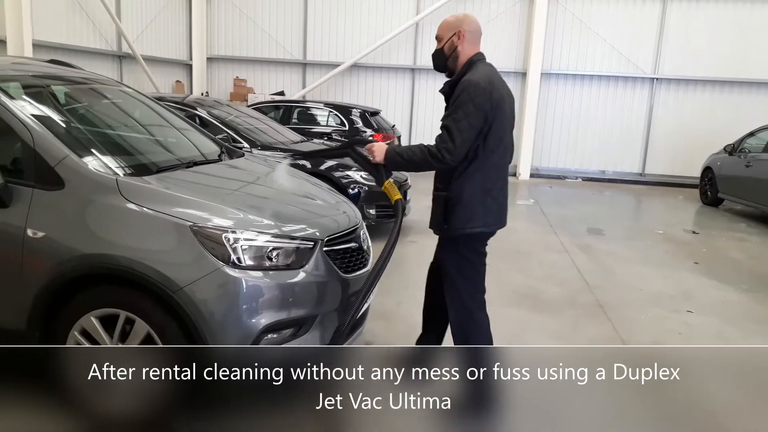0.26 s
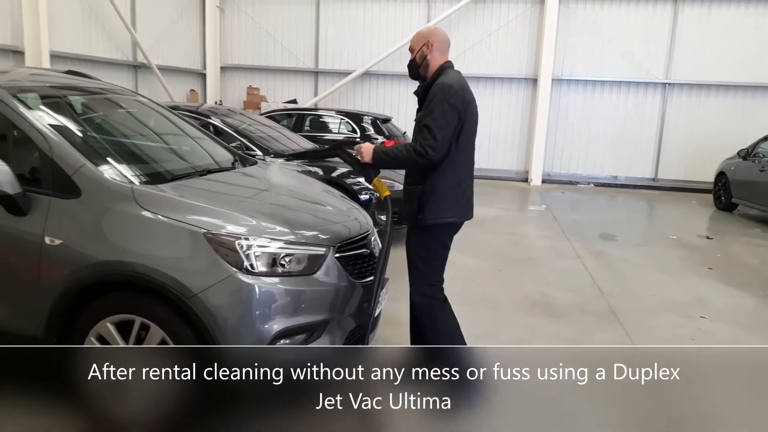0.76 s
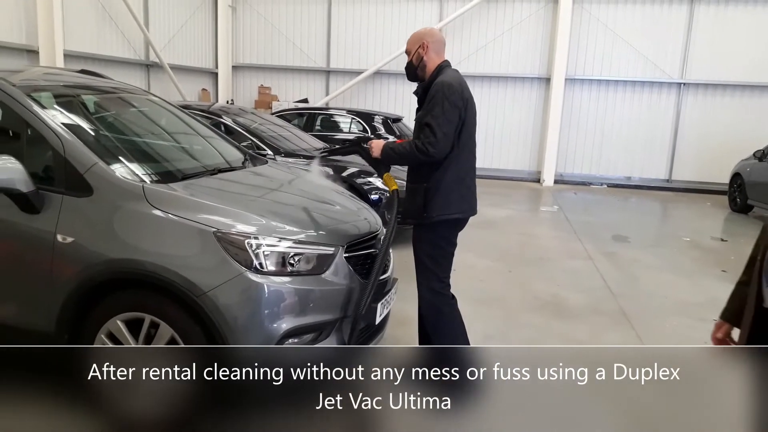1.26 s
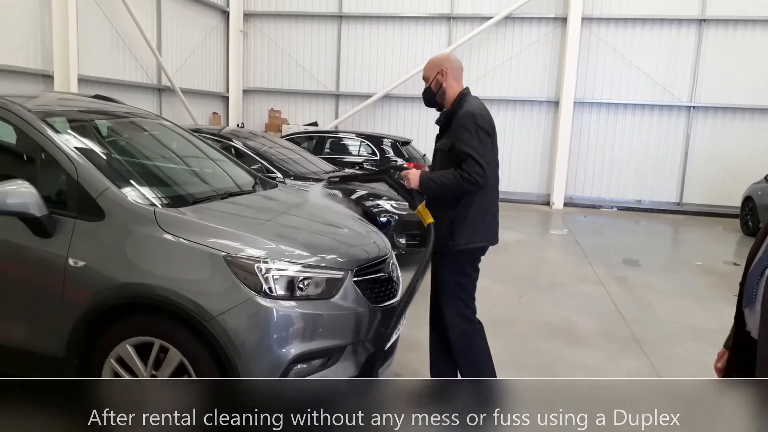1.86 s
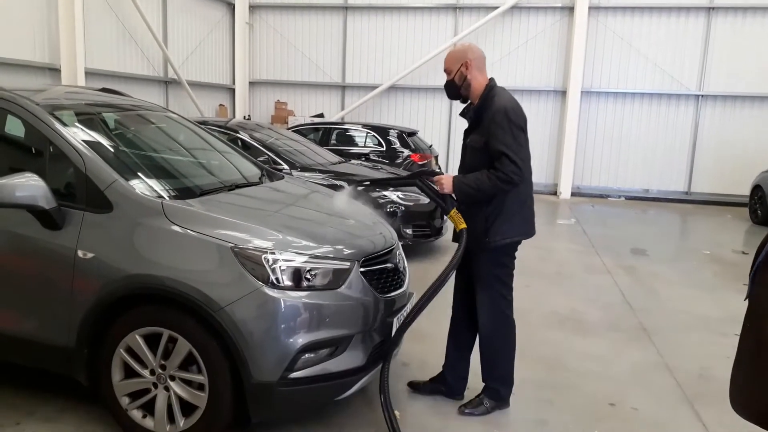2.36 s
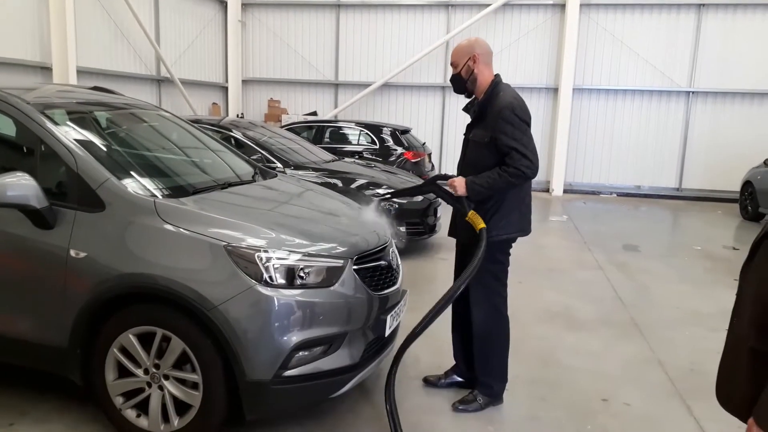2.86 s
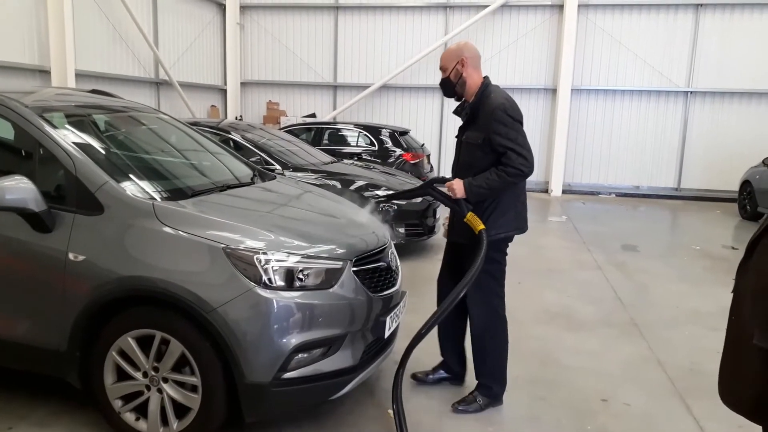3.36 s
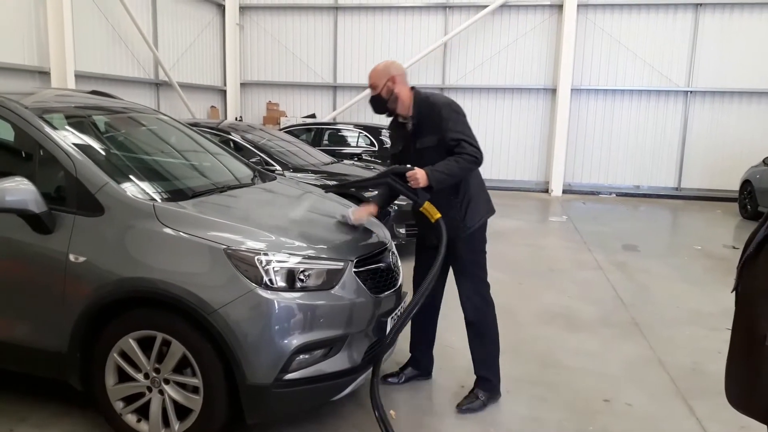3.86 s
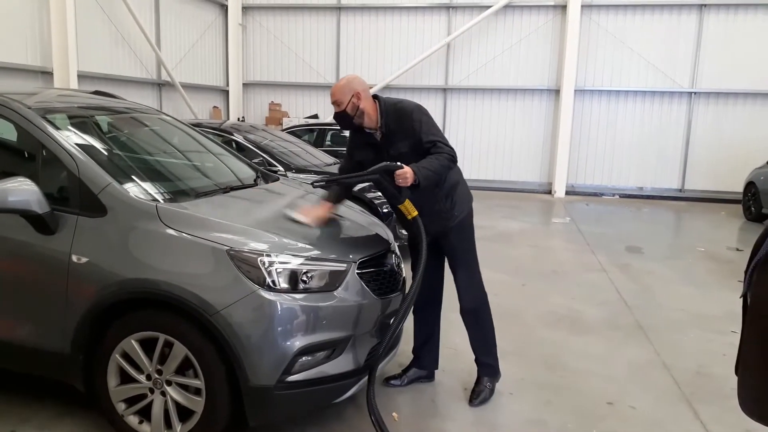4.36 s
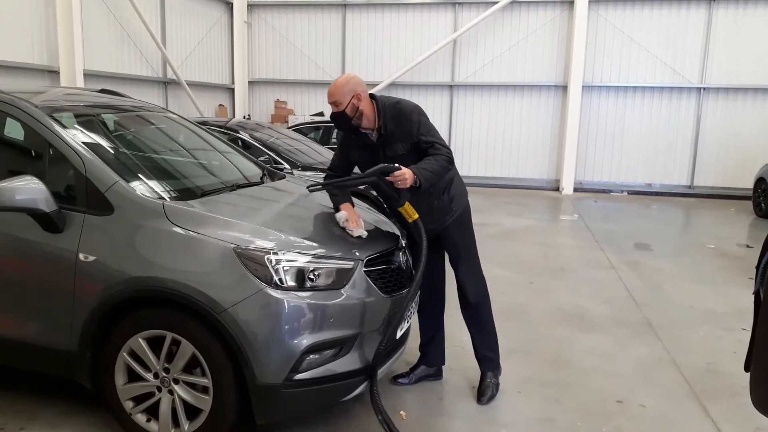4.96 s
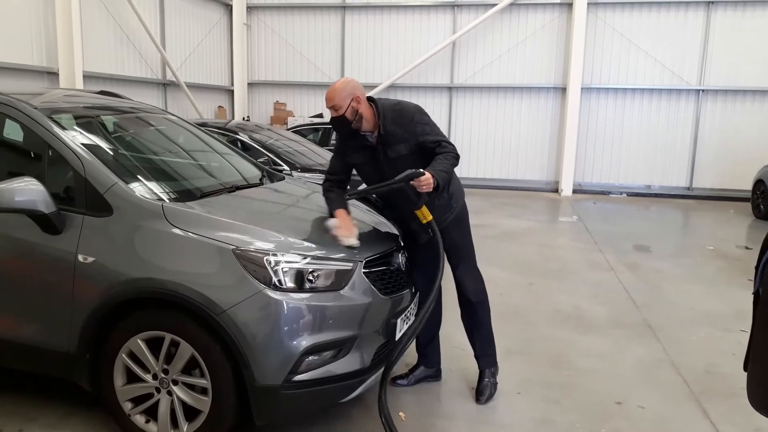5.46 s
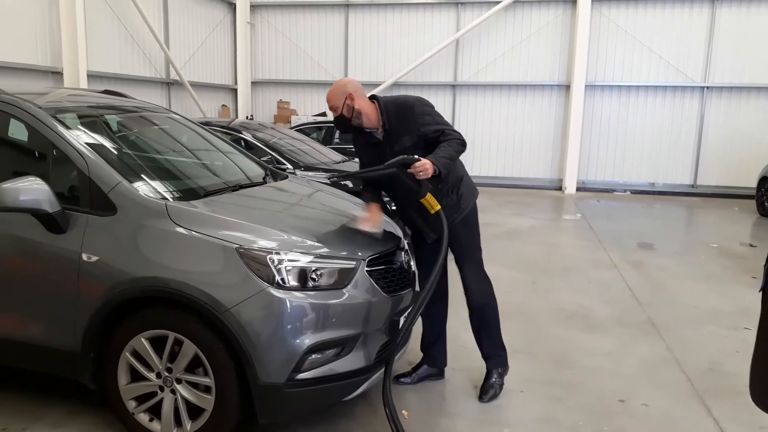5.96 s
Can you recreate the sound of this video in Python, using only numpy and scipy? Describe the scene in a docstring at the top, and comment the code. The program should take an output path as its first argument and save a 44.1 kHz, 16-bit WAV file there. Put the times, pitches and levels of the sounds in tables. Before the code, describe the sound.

A steam cleaner hisses close in front of the microphones in a large, bare hall. The hiss starts faintly, spits at about 0.3 seconds and turns louder and fuller at 0.8 seconds as the jet meets a car bonnet. It carries on with short surges, sizzling and roaring, with brief airy whistles between about 0.8 and 2 seconds and again from 3 to 5. The strongest surge and whistle come near 4.8 seconds. Just after 5 seconds the trigger is released and the hiss dies away in the hall.

Further off, a low motor drone climbs in pitch to about 1.2 seconds, sinks, swells again around 3 seconds and then weakens. Clusters of dull panel thuds boom through the building at the very start, around 1.2 seconds, near 3.9 and from 5 to 5.4. A low air-handling hum continues throughout.

```python
"""A large, bare hall, heard through a pair of microphones as a steam cleaner works over a car bonnet.
In front, the turbulent jet hisses, roars where it strikes the panel and whistles briefly on edges;
the trigger is let go and the hiss dies away in the hall. Further off, a motor drones low, its speed
rising and sinking, and dull blows on a panel boom through the building. Air handling hums behind it all."""
import sys
import numpy as np
from scipy import signal
from scipy.fft import rfft, irfft, next_fast_len
from scipy.io import wavfile

SR = 44100
rng = np.random.default_rng(int(sys.argv[2]) if len(sys.argv) > 2 else 0)


def bounce(signal):
    """Save signal as a 16-bit WAV file at the path given by the first command-line argument."""
    frames = np.transpose(np.atleast_2d(signal))
    limited = np.clip(frames, -1, 1)
    pcm = np.round(limited * 32767).astype(np.int16)
    wavfile.write(sys.argv[1], SR, pcm)


N = 273199
TIME = np.arange(N) / SR

# The jet in front of the microphones: its own hiss, its head-on roar and its grazing sizzle.
# Each row: frequency in Hz, relative spectral density in dB.
JET_SPECTRUM = [(900, -28), (2000, -9), (3200, -4), (4500, 1), (6000, -0.5), (7400, -0.5), (8700, 1.5),
                (9800, -5.5), (12000, -3), (16000, -12)]
ROAR_SPECTRUM = [(150, -10.5), (250, 1), (350, -3.5), (470, -9.5), (650, -6), (950, -7.5), (1300, -4),
                 (1600, -1), (2050, 0.5), (2500, -1), (3100, -0.5), (4200, -6), (7000, -21)]
SIZZLE_SPECTRUM = [(7000, -35), (9300, 2), (10200, -1.5), (11800, 3), (13500, 4), (16000, 4)]
# Steam flow while the trigger is held.
# Each row: time in seconds, level in dB, brightness in dB (plus is more sizzle, minus more roar).
STEAM_FLOW = [(0, -61, -1.8), (.14, -53.5, 1), (.27, -51, 1.7), (.33, -48, 3), (.73, -47.5, 2.2),
              (.82, -40, 0.61), (1.27, -41.5, -1.1), (1.55, -38, 0.61), (1.84, -39, -1.68),
              (2.25, -39, -0.0073), (3.05, -35.5, 1.44), (3.32, -38.5, 1.1), (3.75, -40, 1.03),
              (4.25, -35.5, 1.1), (5.0, -37, 1.76)]
# Surges as the valve spits or the nozzle sweeps close over the bonnet.
# Each row: start in seconds, length in seconds, level in dB, brightness in dB, edge rush in dB.
STEAM_SURGES = [(0.274, 0.027, -39, 6, -47), (0.743, 0.049, -45.5, 12.5, -68), (1.313, 0.3, -46, -8, -56),
                (1.86, 0.16, -39.5, 4, -46.5), (2.367, 0.18, -41.5, 5, -54), (2.662, 0.1, -38.5, 1, -44),
                (2.88, .17, -40, -.5, -42), (3.177, .06, -45, 5, -47), (3.383, 0.11, -38, 2, -40.5),
                (3.479, 0.12, -38.5, 4, -48), (3.794, 0.12, -45, 7, -69), (3.904, 0.17, -46, -7, -54),
                (4.21, 0.087, -40.5, 10, -42), (4.463, 0.052, -50, 20, -56), (4.73, .09, -37.5, -0.5, -45),
                (4.808, 0.099, -33.5, 3, -38.5), (5.58, 0.079, -50.5, 0.5, -59)]
ROAR_DB, SIZZLE_DB = -3, -2.2   # relative to the jet, at brightness 0
ON_PANEL_S, FREE_JET_DB = 0.834, -3   # until the jet meets the panel it roars and sizzles less
SHUT_S, DIE_DB_PER_S = 5.06, 21.5   # the trigger is let go and the hiss dies away in the hall
DIRECT_DB, CLOSE_S = 3.5, 0.11   # jet and sizzle first lose their direct sound as the valve closes
SURGE_ATTACK_S, SURGE_RELEASE_S = 0.035, 0.039
SURGE_ECHO_DB, WHISTLE_ECHO_DB, ECHO_S = -4, -5, 0.18   # surges and whistles linger in the hall

def steam(flutter_db, own_flutter_db):
    """Turbulent jet, roar, sizzle and edge rush flutter together; the first three also on their own."""
    flow_db, flow_bright_db = in_time(STEAM_FLOW)
    shut_for = np.maximum(TIME - SHUT_S, 0)
    direct_db = DIRECT_DB * (np.exp(-shut_for / CLOSE_S) - 1)
    flow_gains = jet_shares(flow_db - DIE_DB_PER_S * shut_for, flow_bright_db)
    power = (flow_gains * from_db(np.outer([1, 0, 1], direct_db))) ** 2   # rows: jet, roar, sizzle
    rush_power = 0
    for start, length, db, bright_db, rush_db in STEAM_SURGES:
        swell = surge(start, length) ** 2
        power = power + jet_shares(db, bright_db)[:, None] ** 2 * swell
        rush_power = rush_power + from_db(rush_db) ** 2 * swell
    free_db = FREE_JET_DB * np.clip((ON_PANEL_S - TIME) / SURGE_ATTACK_S, 0, 1)
    gains = np.sqrt(power) * from_db(np.outer([0, 1, 1], free_db))
    out = np.sqrt(rush_power) * ringing_noise((2, N), hz=3200, width_hz=1400)   # rush over an edge
    for gain, spectrum in zip(gains, (JET_SPECTRUM, ROAR_SPECTRUM, SIZZLE_SPECTRUM)):
        own_db = own_flutter_db * np.array([drift(14), drift(14)])
        out = out + gain * from_db(own_db) * diffuse_noise(spectrum)
    return out * from_db(flutter_db * drift(19))


def jet_shares(db, bright_db):
    """Gains of jet, roar and sizzle: a grazing jet trades roar for sizzle."""
    return from_db([db, db + ROAR_DB - bright_db, db + SIZZLE_DB + bright_db])


def surge(start, length):
    """Envelope of one surge: attack, hold and quick release, then its echo in the hall."""
    attack = np.clip((TIME - start) / SURGE_ATTACK_S, 0, 1)
    over_for = np.maximum(TIME - start - length, 0)
    release = np.exp(-over_for / SURGE_RELEASE_S)
    echo = from_db(SURGE_ECHO_DB) * np.exp(-over_for / ECHO_S)
    return attack * np.maximum(release, echo)


# The jet singing in gaps of the bonnet, in front of the microphones.
# Each row: start in seconds, length in seconds, pitch in Hz, level in dB.
GAP_WHISTLES = [(.28, .074, 7240, -58), (.285, .08, 3200, -53), (.756, .2, 8160, -44),
                (0.8, 0.27, 1540, -48), (1.35, .22, 2120, -49.5), (1.61, 0.24, 1870, -46.5),
                (3.2, 0.073, 10060, -41), (3.915, 0.24, 1910, -51), (4.372, 0.068, 12100, -39),
                (4.834, 0.12, 2124, -35)]

def whistles(q):
    """Turbulence rings in a gap as the jet crosses it: a quick swell, a slower fade and an echo."""
    out = np.zeros((2, N))
    for start, length, hz, db in GAP_WHISTLES:
        since = np.maximum(TIME - start, 0)
        age = since / (length / 4)   # 1 at the peak
        swell = age * np.exp(1 - age)
        echo = from_db(WHISTLE_ECHO_DB) * np.minimum(age, 1) * np.exp(-since / ECHO_S)
        out += from_db(db) * np.maximum(swell, echo) * ringing_noise((2, N), hz, hz / q)
    return out


def bonnet_echo(hiss, delay_s, sway, echo_db):
    """The bonnet mirrors the hiss; the nozzle moves, so a faint ripple slides through the treble."""
    delays = delay_s * np.exp(sway * np.array([drift(0.658), drift(0.68)]))
    mirrored = np.array([np.interp(TIME - delay, TIME, side) for delay, side in zip(delays, hiss)])
    return hiss + from_db(echo_db) * mirrored


# Dull blows further off in the building.
# Each row: start in seconds, relative level in dB, pitch in Hz around which the panel is excited.
BLOWS = [(.102, -25.5, 140), (.139, -32.5, 125), (.18, -30, 190), (.225, -33.5, 257), (.355, -37.5, 316),
         (1.121, -36.5, 470), (1.152, -32, 556), (1.16, -28.5, 237), (1.192, -38, 199), (3.091, -39.5, 266),
         (3.916, -35, 320), (3.942, -33.5, 258), (4.262, -59, 252.3), (5, -32.5, 217), (5.083, -35, 130),
         (5.119, -38, 150), (5.181, -39, 276), (5.236, -44, 280), (5.322, -31, 100.5), (5.346, -34, 151)]
# Modes of the booming panel. Each row: frequency in Hz, relative level in dB, ring time in seconds.
PANEL_MODES = [(110.6, -2.5, 0.14), (137, -2, 0.065), (162.8, -3, 0.064), (201.5, -4.5, 0.052),
               (245.4, -1.5, 0.082), (275.6, -2.5, 0.12), (321.3, -4, 0.13), (518, -6, .04),
               (622, -8, 0.047), (694.7, -5.5, 0.057)]

def thuds(contact_s, spread_octaves, rattle_db, dull_hz):
    """Each soft blow rings the panel's modes near its pitch, with a little rattle around each."""
    out, t = np.zeros(N + SR), TIME[:SR // 2]
    for start, db, centre_hz in BLOWS:
        at = round(start * SR)
        for hz, mode_db, t60 in PANEL_MODES:
            reach = np.exp(-.5 * (np.log2(hz / centre_hz) / spread_octaves) ** 2)
            swell = (1 - np.exp(-t / contact_s)) ** 2 * from_db(-60 * t / t60)
            ring = np.sin(2 * np.pi * hz * t) + from_db(rattle_db) * ringing_noise(len(t), hz, hz / 2)
            out[at:at + len(t)] += from_db(db + mode_db) * reach * swell / swell.max() * ring
    return signal.sosfilt(signal.butter(2, dull_hz, fs=SR, output="sos"), out[:N])


# The motor, further off than the jet. Each row: time in seconds, firing rate in Hz, level in dB.
MOTOR_RUN = [(0, 47.6, -64), (.25, 51.7, -46.5), (.73, 60.5, -47), (.81, 64, -38.5), (1.2, 74.9, -33),
             (1.42, 73.2, -37), (1.6, 66.2, -35), (1.78, 55.2, -50.5), (2.18, 43.6, -55), (2.33, 44, -43.5),
             (2.8, 47.74, -38), (3.12, 50.1, -34), (3.3, 51.8, -46), (3.95, 50.7, -42), (4.3, 49.7, -59),
             (4.75, 45.96, -47), (4.98, 46.27, -66), (6.19, 46, -53)]
# Standing waves of the hall, as they reach the microphones.
# Each row: frequency in Hz, width in Hz, peak in dB relative to the motor's first order.
HALL_WAVES = [(85.96, 4.9, 5), (99.8, 3.2, -9), (109.8, 1.6, 7)]

def motor(rough_db, second_order_db):
    """The motor's two lowest orders, unsteady; the second swells as it glides through a standing wave."""
    hz, db = in_time(MOTOR_RUN)
    phase = 2 * np.pi * np.cumsum(hz) / SR
    second_gain = from_db(second_order_db)
    for wave_hz, width_hz, peak_db in HALL_WAVES:
        second_gain = second_gain + from_db(peak_db) * np.exp(-2 * ((2 * hz - wave_hz) / width_hz) ** 2)
    first = from_db(rough_db * drift(12)) * np.sin(phase)
    second = second_gain * from_db(rough_db * drift(10)) * np.sin(2 * phase)
    return from_db(db) * (first + second)


# The bare hall's decay. Each row: frequency in Hz, reverberation time in seconds.
HALL_DECAY = [(80, 1.64), (300, 1.3), (1000, 4.4), (4000, 5.2)]

def hall_reverb(x, build_s):
    """The hall answers with a diffuse tail that builds up and dies away, octave by octave."""
    noise = diffuse_noise([(20, 0), (20000, 0)])[:, :2 * SR]
    t, tail = TIME[:2 * SR], 0
    for hz in 80 * 2 ** np.arange(6):
        band = signal.butter(2, [hz / np.sqrt(2), hz * np.sqrt(2)], "band", fs=SR, output="sos")
        tail = tail + signal.sosfilt(band, noise) * from_db(-60 * t / at_hz(HALL_DECAY, hz))
    tail = tail * (1 - np.exp(-t / build_s))
    tail = tail / np.sqrt(np.sum(tail ** 2) / 2)   # unit energy per side
    return signal.fftconvolve(x[None], tail, axes=1)[:, :N]


# The hum all around the microphones. Each row: frequency in Hz, relative spectral density in dB.
HUM_SPECTRUM = [(25, -23), (45, 1.5), (72, 1.5), (105, 5.5), (150, -1.5), (190, -2), (250, -2.5), (345, 1),
                (430, -9.5), (600, -8.5), (1000, -14.5), (2000, -18), (5000, -33), (16000, -29)]
# Its slow rise and fall. Each row: time in seconds, level in dB.
HUM_LEVEL = [(0, -49), (.3, -44.5), (.65, -47.5), (.9, -45), (2, -47.5), (3.5, -47), (5.3, -48), (5.7, -49),
             (6.19, -50.5)]

def hall_hum():
    """Air handling and far machinery fill the hall with low, diffuse noise."""
    db, = in_time(HUM_LEVEL)
    return from_db(db) * diffuse_noise(HUM_SPECTRUM)


# How alike the hall sounds at the two microphones. Each row: frequency in Hz, likeness from 0 to 1.
MIC_LIKENESS = [(50, 0.77), (130, 0.78), (300, 0.64), (600, 0.39), (1100, 0.091), (2500, 0.054), (6000, 0),
                (16000, 0)]

def diffuse_noise(spectrum):
    """Coloured stereo noise of rms 1, alike on both sides only in the bass."""
    size = next_fast_len(N, real=True)
    hz = np.arange(size // 2 + 1) * SR / size
    mid, side = rfft(rng.standard_normal((2, size))) * from_db(at_hz(spectrum, hz))
    alike = at_hz(MIC_LIKENESS, hz)
    left_right = np.sqrt(1 + alike) * mid + np.sqrt(1 - alike) * side * [[1], [-1]]
    return rms_one(irfft(left_right, size)[:, :N])


def ringing_noise(size, hz, width_hz):
    """Noise passed twice through a two-pole resonance; rms 1."""
    r = np.exp(-np.pi * width_hz / SR)
    b = np.array([1, 0, -1]) * (1 - r * r) / 2
    a = [1, -2 * r * np.cos(2 * np.pi * hz / SR), r * r]
    once = signal.lfilter(b, a, rng.standard_normal(size))
    return rms_one(signal.lfilter(b, a, once))


def drift(rate):
    """A slow random wander of rms 1, changing about `rate` times a second."""
    r = np.exp(-200 * np.pi * rate / SR)
    steps = rng.standard_normal(N // 100 + 1002)   # one every 100 samples, plus 1000 to settle
    slow = signal.lfilter([1], [1, -2 * r, r * r], steps)[1000:]
    return np.interp(np.arange(N) / 100, np.arange(len(slow)), rms_one(slow))


def from_db(db):
    """Decibels to gain."""
    return 10 ** (np.asarray(db) / 20)


def rms_one(x):
    """Scale to rms 1."""
    return x / np.sqrt(np.mean(x ** 2) + 1e-20)


def in_time(rows):
    """Each column of a curve at every sample."""
    times, *columns = np.transpose(rows)
    return [np.interp(TIME, times, column) for column in columns]


def at_hz(points, hz):
    """Read a table on a log-frequency axis."""
    point_hz, values = np.transpose(points)
    return np.interp(np.log(np.maximum(hz, 1)), np.log(point_hz), values)


def scene():
    """Steam in front of the microphones, thuds and drone further off, over the hum of the hall."""
    jet = steam(flutter_db=0.38, own_flutter_db=0.43) + whistles(q=5.5)
    hiss = bonnet_echo(jet, delay_s=0.0025, sway=0.1597, echo_db=-12.5)
    blows = thuds(contact_s=0.0068, spread_octaves=0.48, rattle_db=-8, dull_hz=930)
    boom = from_db(-0.5) * blows + from_db(-2.5) * hall_reverb(blows, build_s=0.0033)
    drone = motor(rough_db=1.5, second_order_db=-23)
    return hiss + boom + drone + hall_hum()


# The two microphones are coloured differently. Each row: frequency in Hz, left minus right in dB.
MIC_BALANCE = [(60, -3), (170, 0), (330, -2), (1000, 0), (2800, 0.3), (4200, 0.5), (6400, -3), (9800, 1.4),
               (15000, -0.8)]
CUTOFF_HZ = 15850

def record(dry):
    """Each microphone adds its colour; the top is cut steeply."""
    size = next_fast_len(N + SR, real=True)
    tilt_db = at_hz(MIC_BALANCE, np.arange(size // 2 + 1) * SR / size) / 2
    heard = irfft(rfft(dry, size) * from_db([tilt_db, -tilt_db]), size)[:, :N]
    return signal.sosfilt(signal.ellip(12, .1, 80, CUTOFF_HZ, fs=SR, output="sos"), heard)


dry = scene()
out = record(dry)
bounce(out)
```